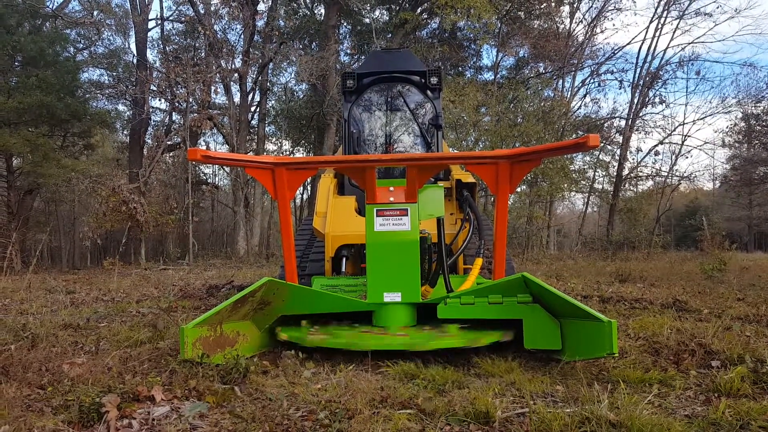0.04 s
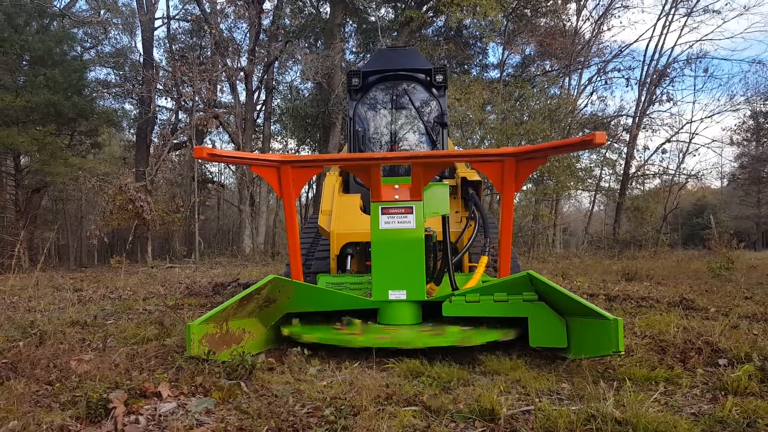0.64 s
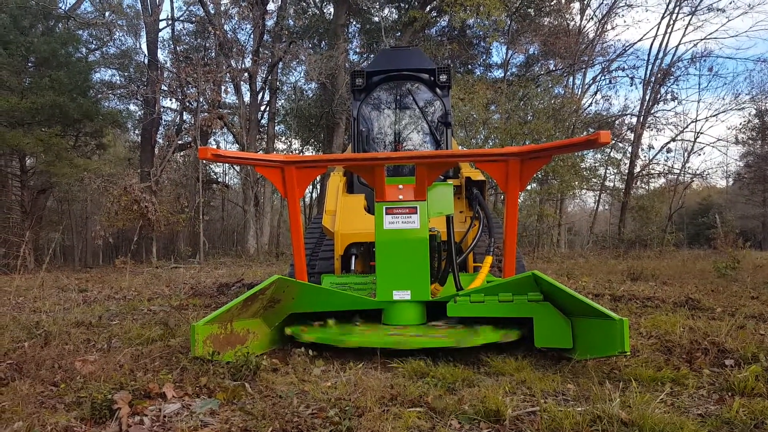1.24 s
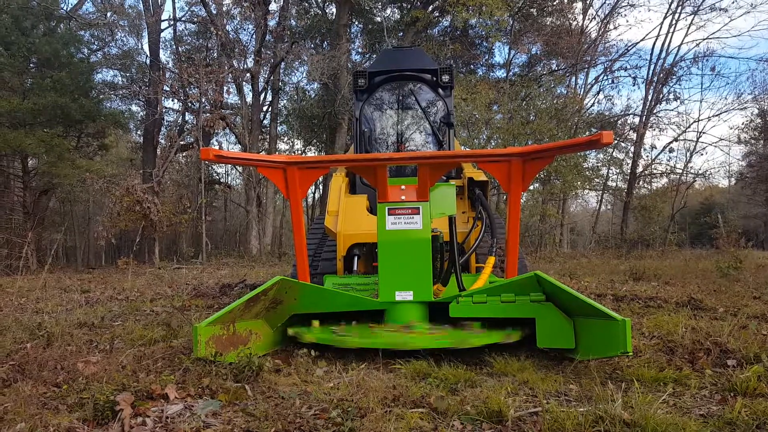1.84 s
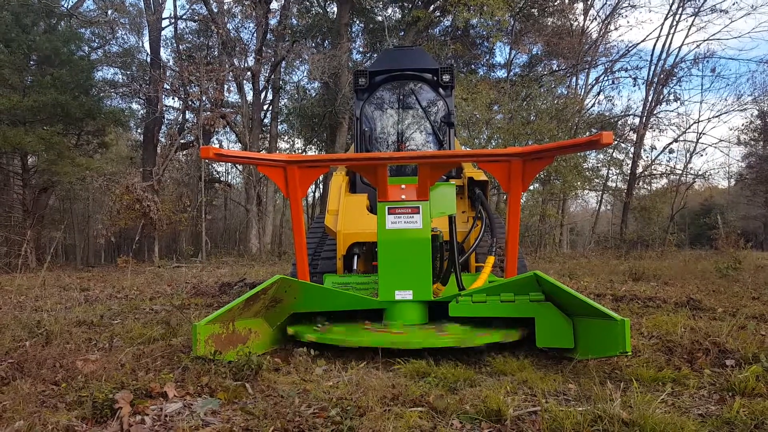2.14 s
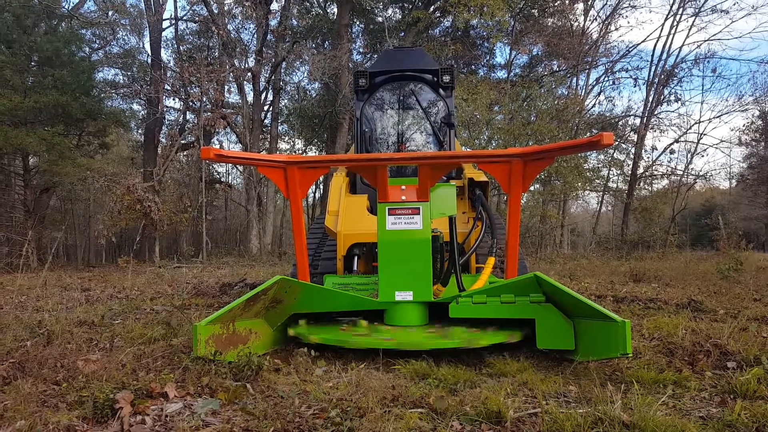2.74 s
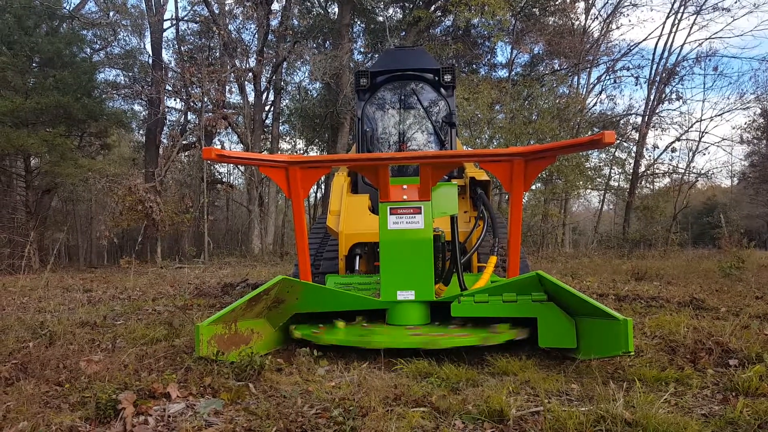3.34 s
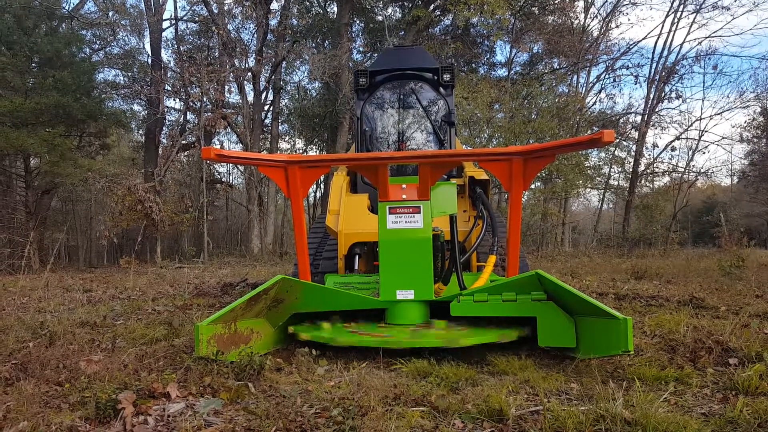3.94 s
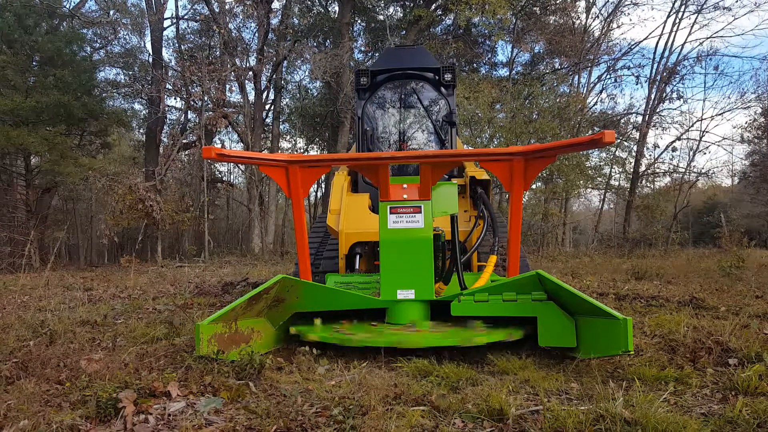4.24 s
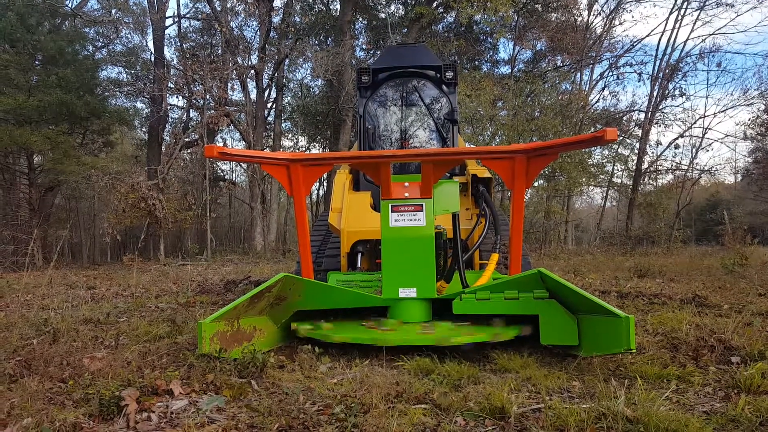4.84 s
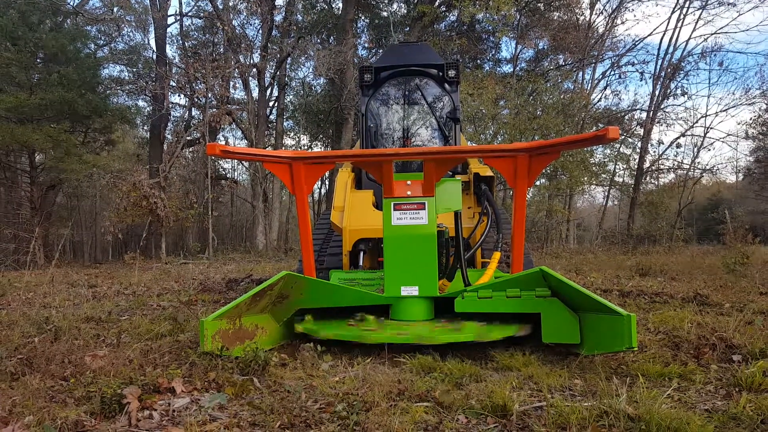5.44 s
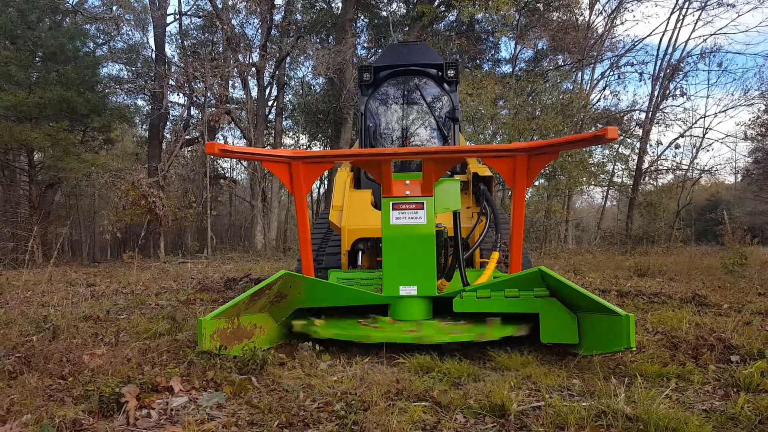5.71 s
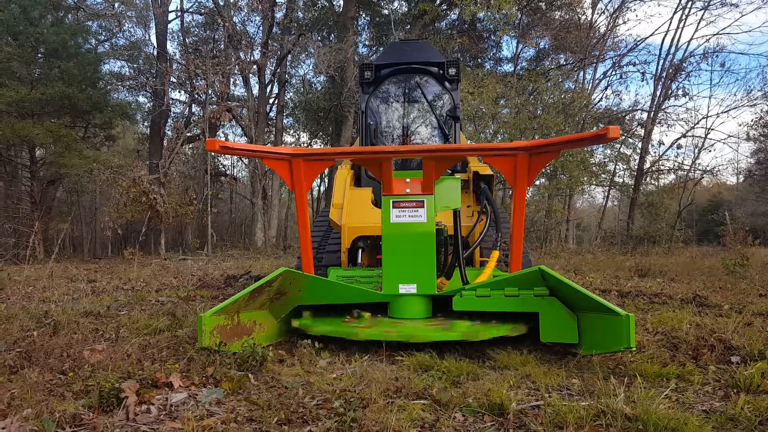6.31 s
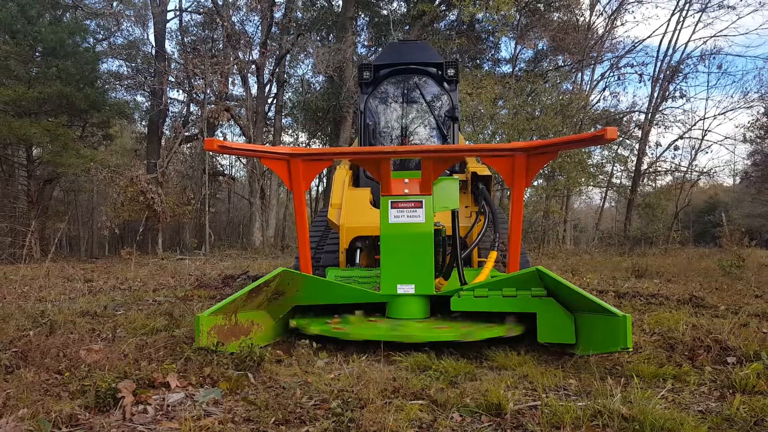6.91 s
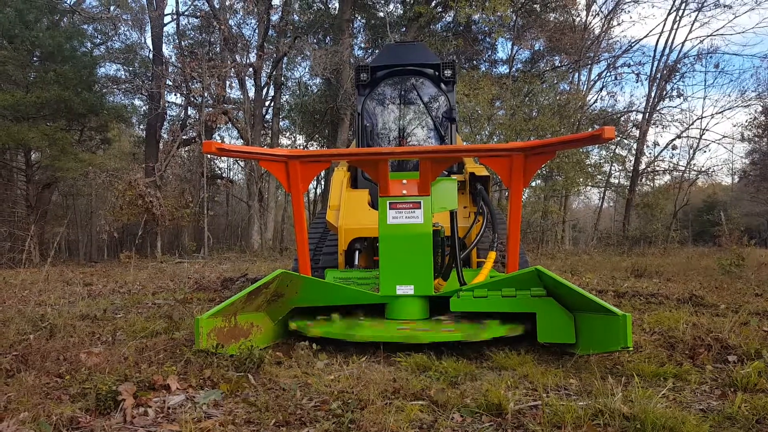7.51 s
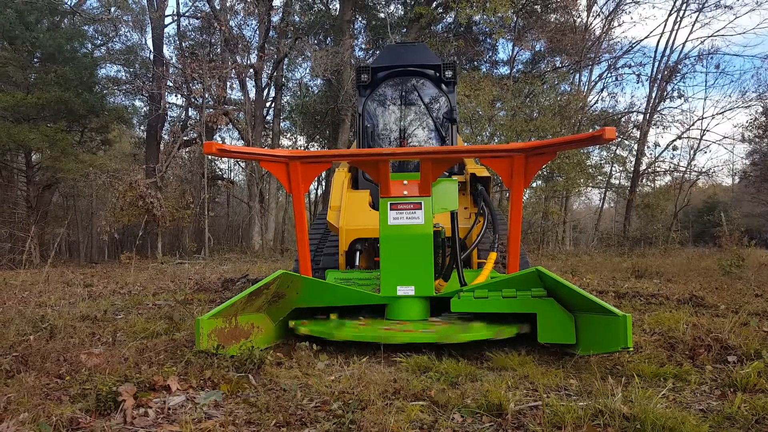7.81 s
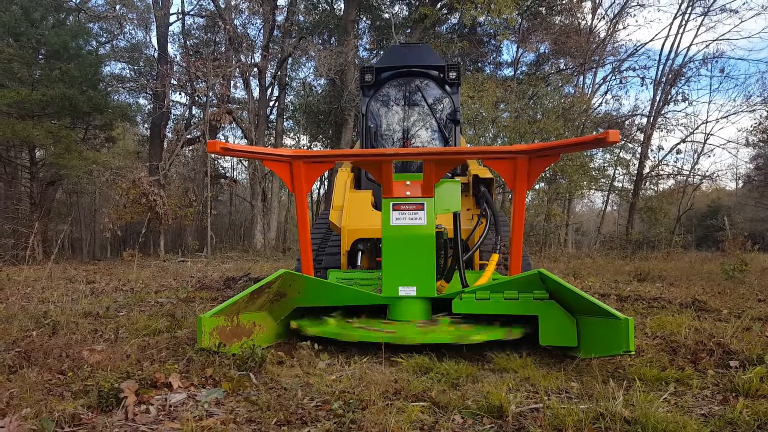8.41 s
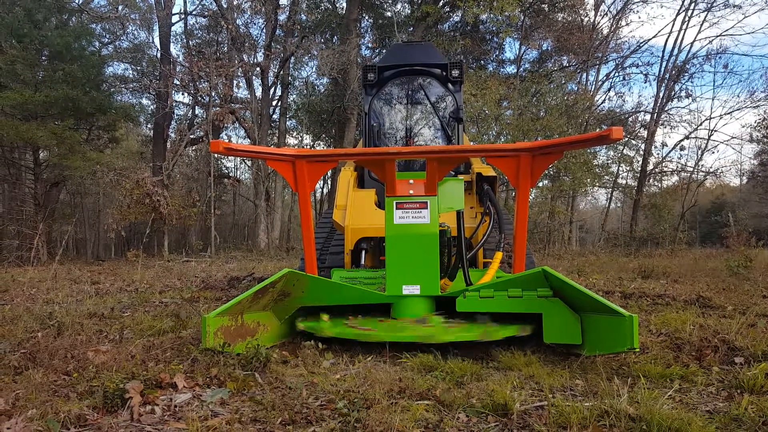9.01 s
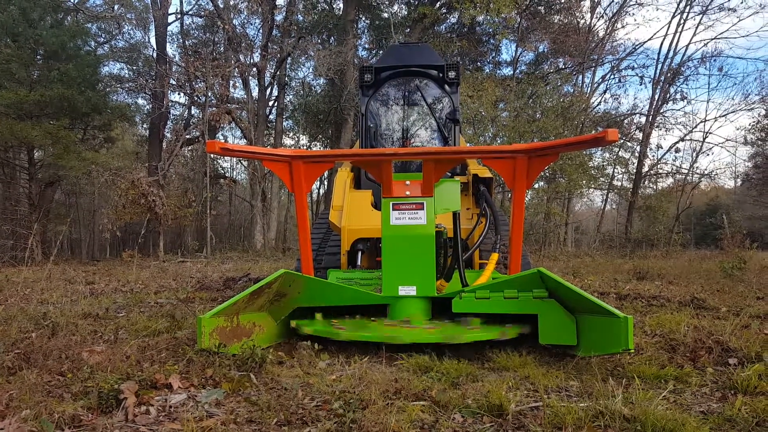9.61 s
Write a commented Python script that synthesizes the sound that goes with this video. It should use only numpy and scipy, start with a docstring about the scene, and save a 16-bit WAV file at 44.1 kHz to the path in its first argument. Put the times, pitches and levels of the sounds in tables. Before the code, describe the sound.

A diesel machine idles with a steady, throbbing rumble while its coasting cutting disc ticks and scrapes regularly on the left.

```python
"""A clearing, with a tracked mulcher idling a few metres ahead.
Its governed diesel carries the scene: a steady hum, an exhaust roar that throbs with each pulse,
and injector and valve knocks shaking the block, with a wavering drone of engine and cooling fan behind.
Mostly on the left, the cutting disc coasts slowly down and rubs once a turn: a tick, a scrape
and a trail of small chinks. It sets loose fittings rattling, and three faint squeaks poke through."""
import sys
import numpy as np
from scipy.fft import rfft, irfft, next_fast_len
from scipy.io import wavfile
from scipy.ndimage import map_coordinates

SR = 44100
rng = np.random.default_rng(int(sys.argv[2]) if len(sys.argv) > 2 else 0)


def master_out(mix):
    """Clip the mix to full scale and print it as 16-bit PCM to the path in sys.argv[1]."""
    frames = np.transpose(np.atleast_2d(mix))
    ceiling = np.clip(frames, -1, 1)
    pcm = np.round(ceiling * 32767).astype(np.int16)
    wavfile.write(sys.argv[1], SR, pcm)


N = 426006
TIME = np.arange(N) / SR
CRANK_HZ = 35.735
FIRST_TICK_S, FIRST_TURN_S, LONGER_PER_TURN_S = -0.07886, 0.27644, 0.0005405  # the coasting disc

# hum of the exhaust and block: crank_multiple, level_db
ENGINE_ORDERS = [(1, -53), (2, -43.5), (3, -28), (4, -51.5), (6, -40.5), (13.5, -53), (18, -68.5),
                 (19, -62.5), (21, -65.5), (30, -65.5), (31, -71.5), (45, -69.5)]
# dark colour of the exhaust and fan turbulence: frequency_hz, level_db
ROAR_COLOUR = [(20, -81), (42, -77), (62, -67.5), (80, -59.5), (98, -61), (125, -73.5), (155, -71),
               (175, -56.5), (215, -63.5), (250, -65.5), (310, -73), (380, -69), (430, -72.5), (540, -72),
               (700, -99.5), (1200, -120)]
# slow rise and fall of the roar: time_s, gain_db
ROAR_SWELL = [(0.6, 1.3), (1.3, 0), (2.7, .2), (5.6, -.6), (6.6, .9), (9.66, -.5)]
# injector and valve knocks: cycle_fraction, strength
KNOCKS = [(.25, 0.85), (.4, 1), (0.528, 0.72), (.75, 0.94), (.84, 0.77)]
# colour of the engine block and panels: frequency_hz, level_db
BLOCK_COLOUR = [(250, -100), (450, -79.5), (680, -77), (800, -80.5), (890, -79.5), (1000, -82.5),
                (1550, -81.5), (2000, -87.5), (2650, -99), (3400, -97), (5000, -103), (8000, -113),
                (16000, -116)]
# stereo image of the roar and clatter: frequency_hz, left_right_correlation
ENGINE_IMAGE = [(100, 0.94), (270, 1), (450, 0.96), (740, 0.93), (1220, 0.62), (2010, 0.33), (3330, -0.51),
                (6000, -0.75)]
# wavering drone tones of the engine and fan: pitch_hz, level_db
DRONE_TONES = [(49.5, -63), (117.5, -46), (134.2, -52.5), (165.6, -46.5), (178.2, -48.5), (199, -49.5),
               (379.5, -62.5), (742, -66.5), (883, -64.5), (999, -70), (1143, -68.5)]
# how hard the disc strikes once a turn: time_s, level_db
TICK_LEVEL = [(0, -35), (1.5, -33), (3.4, -37), (9.66, -35.5)]
# high spots where the disc rubs harder: turn_fraction, half_width_turns, level_db
HIGH_SPOTS = [(0.145, 0.031, -39.5), (.26, 0.058, -48), (.47, 0.11, -53.5), (.9, .02, -57)]
# bright colour of the rubbing as heard on the left: frequency_hz, gain_db
RUB_COLOUR_LEFT = [(900, -29), (2000, -5.5), (3400, -12.5), (5600, -8), (6700, 4.5), (7400, -3),
                   (8400, -7.5), (9500, -22.5), (11100, -22), (12000, -9.5), (14000, -5), (15400, 1)]
# colour of the rubbing as heard on the right: frequency_hz, gain_db
RUB_COLOUR_RIGHT = [(1500, -34.5), (3400, -16), (4500, -16), (6500, -24), (8200, -26), (11000, -23.5),
                    (12500, -22.5), (13500, -14.5), (15500, -28.5)]
# burrs that chink on every turn: turn_fraction, gain_db
BURRS = [(.089, -1.5), (.232, 0), (.287, -4.5), (.303, -2.5), (.373, -2.5), (.403, -2.5), (.444, 1),
         (.467, 0), (.515, 0), (.574, -1.5), (.659, -7), (.731, -2.5), (.803, -6.5), (.873, 1),
         (.945, -1.5), (.968, 0)]
# even hiss of the spindle: frequency_hz, level_db
SPINDLE_COLOUR = [(800, -110), (2100, -85.5), (3200, -96.5), (5800, -98.5), (6600, -88.5), (7400, -103),
                  (9500, -120)]
# jolts the disc gives the loose fittings: turn_fraction, gain_db
JOLTS = [(.053, -2), (.29, -2), (.433, -6), (.468, -2.5), (.503, 0.5), (.575, 0), (.648, -5), (.693, -5),
         (.91, -4.5)]
# metallic colour of the fittings: frequency_hz, gain_db
FITTINGS_COLOUR = [(1200, -27), (2200, 4.5), (3000, -4.5), (4200, 1), (5400, -0.5), (6500, -6.5),
                   (8500, -16.5), (10000, -38)]
# faint squeaks: peak_s, pitch_hz, half_width_hz, level_db
SQUEAKS = [(2.353, 2190, 90, -54), (3.725, 2250, 220, -56), (7.748, 2280, 200, -55)]


def engine_hum(crank, waver_db):
    """The diesel's core: clean tones locked to the crankshaft, peaking together."""
    return np.sqrt(2) * sum(amp(db + waver_db * wobble(7)) * np.cos(2 * np.pi * order * crank)
                            for order, db in ENGINE_ORDERS)


def exhaust_roar(crank, throb):
    """Low turbulence that swells with each exhaust pulse, three to a revolution."""
    puffs = unit(1 + throb * np.sin(2 * np.pi * 3 * crank))
    roar = spread(coloured(puffs * rng.standard_normal((2, N)), ROAR_COLOUR))
    return amp(np.interp(TIME, *np.transpose(ROAR_SWELL))) * roar


def block_clatter(crank, repeat_share, knock_depth, knock_s, fade_db_per_s):
    """Knocks shake the block; part of its answer is the same in every two-revolution cycle."""
    # no two combustions are equally hard, and the clatter slowly softens
    gain_db = 0.53 * wobble(18) - fade_db_per_s * (TIME - TIME.mean())
    cycle = crank / 2 % 1
    cycle_samples = round(2 * SR / CRANK_HZ)
    looped = np.array([map_coordinates(grain, [cycle * cycle_samples], mode="grid-wrap")
                       for grain in rng.standard_normal((2, cycle_samples))])
    looped = filtered(looped, lambda hz: 1 / np.sqrt(1 + (hz / 2500) ** 4))
    shake = np.sqrt(repeat_share) * looped + np.sqrt(1 - repeat_share) * rng.standard_normal((2, N))
    knocks = sum(strength * np.exp(-((cycle - at) % 1) * 2 / CRANK_HZ / knock_s)
                 for at, strength in KNOCKS)
    return amp(gain_db) * spread(coloured(shake * unit(1 + knock_depth * knocks), BLOCK_COLOUR))


def wavering_drone(waver_db, drift_cycles):
    """Looser tones of the engine and fan that wander in level and phase."""
    drone = np.zeros(N)
    for hz, db in DRONE_TONES:
        level = amp(db + waver_db * wobble(5))
        phase = hz * TIME + drift_cycles * wobble(3) + rng.random()
        drone += level * np.sin(2 * np.pi * phase)
    return np.sqrt(2) * drone


def disc_rub(tick_s, scatter_db, drag_db, grit_db, uneven_db, fade_db_per_s):
    """The disc rubs: one tick a turn over a light drag that bites harder at the high spots."""
    turn, angle, period_s = disc_turns()
    tick_db = np.interp(TIME, *np.transpose(TICK_LEVEL)) + rng.normal(0, scatter_db, turn[-1] + 1)[turn]
    tick = amp(tick_db) * np.exp(-angle * period_s / tick_s)
    spot_power = sum(amp(db) ** 2 * np.exp(-((angle - at) / width) ** 2) for at, width, db in HIGH_SPOTS)
    texture_db = grit_db * wobble(600) + uneven_db * wobble(14)
    # the scrape eases as the disc slows
    scrape = np.sqrt(amp(drag_db) ** 2 + spot_power) * amp(texture_db - fade_db_per_s * TIME)
    noise = rng.standard_normal((2, N))
    rasp = filtered(noise, lambda hz: amp([along(RUB_COLOUR_LEFT, hz), along(RUB_COLOUR_RIGHT, hz)]))
    return np.hypot(tick, scrape) * rasp / np.std(rasp[0])


def burr_chinks(gain_db, ring_s):
    """Each passing burr gives a short, high ring near 6.7 kHz."""
    strikes = each_turn(BURRS, ring_s, scatter_db=1.8)
    return amp(gain_db) * strikes * ringing(centre_hz=6660, half_width_hz=180)


def spindle_hiss():
    """The spindle lays a thin, even hiss under the rubbing."""
    return coloured(rng.standard_normal(N), SPINDLE_COLOUR)


def fittings_rattle(gain_db, ring_s):
    """Loose fittings click softly, left of centre, as the disc shakes them."""
    shiver = unit(each_turn(JOLTS, ring_s, scatter_db=3.0))
    metal = unit(filtered(rng.standard_normal((2, N)), lambda hz: amp(along(FITTINGS_COLOUR, hz))))
    return amp(gain_db) * shiver * metal * amp([[0], [-9]])


def squeaks(half_length_s):
    """Brief, rough squeaks: narrow bands of noise that swell and vanish."""
    return sum(amp(db) * np.exp(-((TIME - peak_s) / half_length_s) ** 2) * ringing(hz, width)
               for peak_s, hz, width, db in SQUEAKS)


def disc_turns():
    """The disc's turn number, fraction of the turn gone and turn length; each takes a little longer."""
    periods_s = FIRST_TURN_S + LONGER_PER_TURN_S * np.arange(int(N / SR / FIRST_TURN_S) + 2)
    starts_s = FIRST_TICK_S + np.cumsum(periods_s) - periods_s
    position = np.interp(TIME, starts_s, np.arange(len(starts_s)))
    turn = position.astype(int)
    return turn, position % 1, periods_s[turn]


def each_turn(hits, decay_s, scatter_db):
    """Envelope of small hits that land at the same points of every turn."""
    turn, angle, period_s = disc_turns()
    envelope = np.zeros(N)
    for at, db in hits:
        strength = amp(db + rng.normal(0, scatter_db, turn[-1] + 1))[turn]
        envelope += strength * np.exp(-((angle - at) % 1) * period_s / decay_s)
    return envelope


def amp(db):
    """Decibels to gain."""
    return 10 ** (np.asarray(db) / 20)


def unit(x):
    """Scale to rms 1."""
    return x / np.sqrt(np.mean(x ** 2) + 1e-20)


def along(points, hz):
    """Read a curve of (frequency_hz, value) points on a log axis."""
    points_hz, values = np.transpose(points)
    return np.interp(np.log(hz + 1), np.log(points_hz + 1), values)


def wobble(rate_hz):
    """Smooth random modulation, rate_hz knots a second."""
    return map_coordinates(rng.standard_normal(int(N * rate_hz / SR) + 4), [TIME * rate_hz])


def filtered(x, response):
    """Equalise x with a gain for each frequency."""
    size = next_fast_len(N + SR // 2)
    return irfft(rfft(x, size) * response(np.fft.rfftfreq(size, 1 / SR)), size)[..., :N]


def coloured(noise, colour):
    """Give white noise of rms 1 a spectrum in dB per Hz."""
    return filtered(noise, lambda hz: amp(along(colour, hz)) * np.sqrt(SR / 2))


def ringing(centre_hz, half_width_hz):
    """Noise of rms 1 in one narrow band."""
    noise = rng.standard_normal(N)
    return unit(filtered(noise, lambda hz: 1 / (1 + ((hz - centre_hz) / half_width_hz) ** 2)))


def spread(pair):
    """Two unrelated signals to stereo: bass centred, treble wide and partly out of phase."""
    def mid_side_gains(hz):
        width = np.arccos(np.clip(along(ENGINE_IMAGE, hz), -1, .998)) / 2
        return np.array([np.cos(width), np.sin(width)])
    mid, side = filtered(pair, mid_side_gains)
    return np.array([mid + side, mid - side])


def scene():
    """The mix: engine ahead, disc rubbing to the left."""
    crank = CRANK_HZ * TIME + 0.004 * wobble(2.5)  # revolutions; the governor allows a little drift
    roar = exhaust_roar(crank, throb=0.28)
    clatter = block_clatter(crank, repeat_share=.2, knock_depth=0.54, knock_s=0.0025, fade_db_per_s=.18)
    hum = engine_hum(crank, waver_db=0.06)
    drone = wavering_drone(waver_db=1.2, drift_cycles=0.16)
    engine = (hum + roar + clatter + drone) * amp([[-.1], [.1]])
    rub = disc_rub(tick_s=0.0059, scatter_db=1.7, drag_db=-54,
                   grit_db=1.7, uneven_db=0.6, fade_db_per_s=0.2)
    sparkle = (burr_chinks(gain_db=-50.5, ring_s=0.0041) + spindle_hiss()) * amp([[0], [-24]])  # far left
    rattle = fittings_rattle(gain_db=-65.5, ring_s=0.0041)
    return engine + rub + sparkle + rattle + squeaks(half_length_s=0.027)


def record(dry):
    """Soften both ends with a 3 ms fade and cut the very top of the treble."""
    fade = np.clip(np.minimum(TIME, TIME[::-1]) / .003, 0, 1)
    return filtered(dry * fade, lambda hz: hz < 15750)


dry = scene()
out = record(dry)
master_out(out)
```